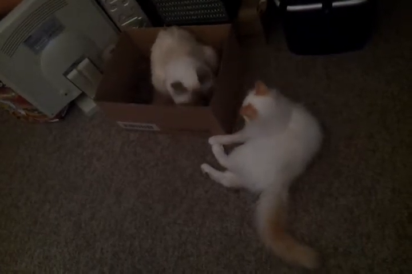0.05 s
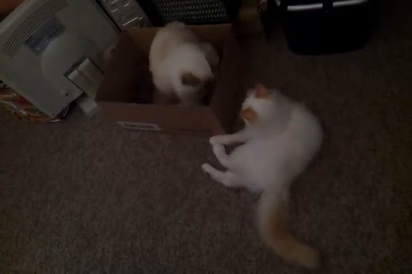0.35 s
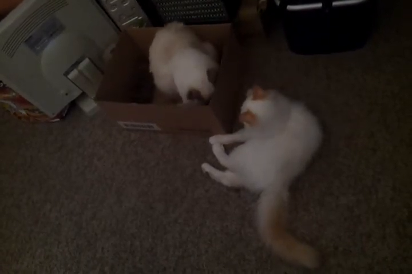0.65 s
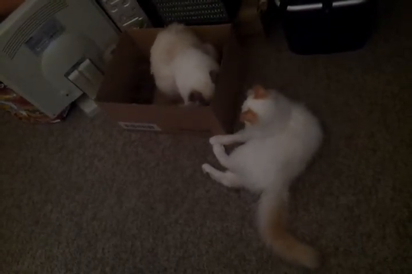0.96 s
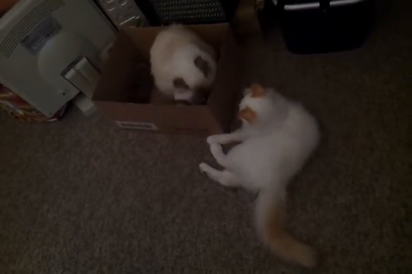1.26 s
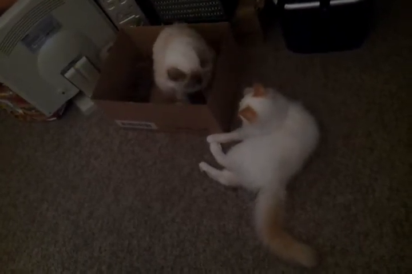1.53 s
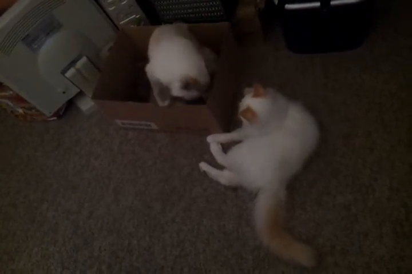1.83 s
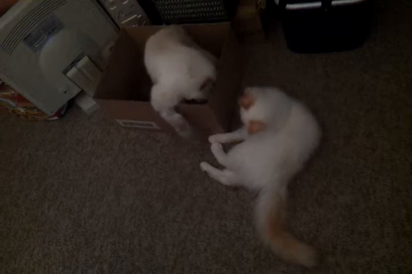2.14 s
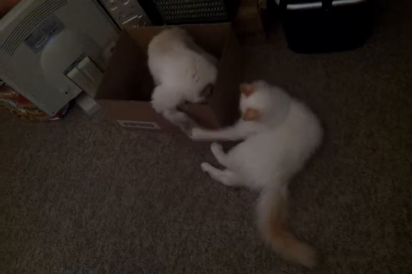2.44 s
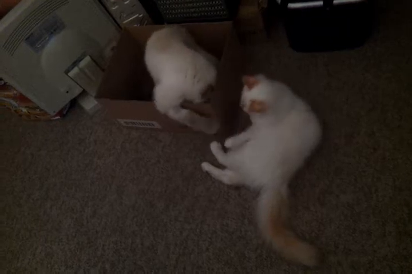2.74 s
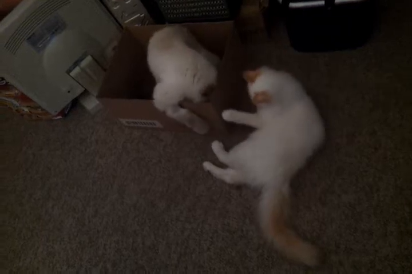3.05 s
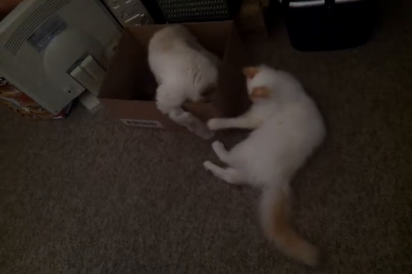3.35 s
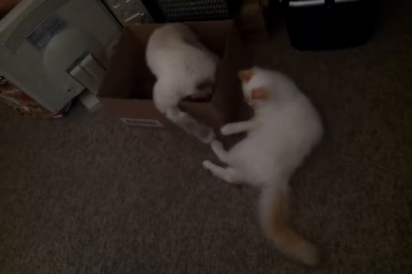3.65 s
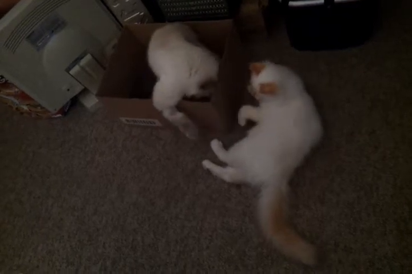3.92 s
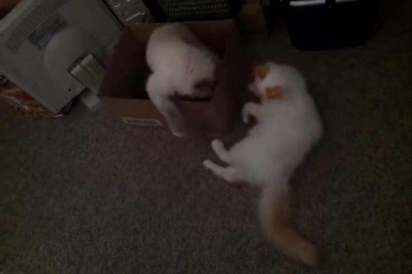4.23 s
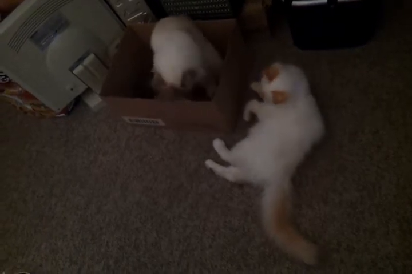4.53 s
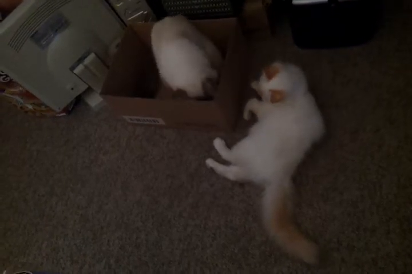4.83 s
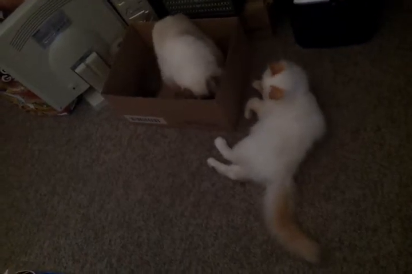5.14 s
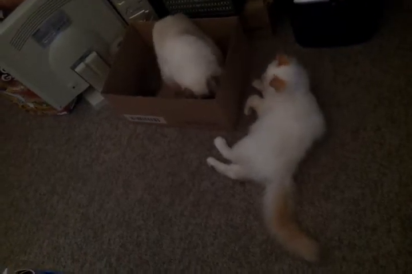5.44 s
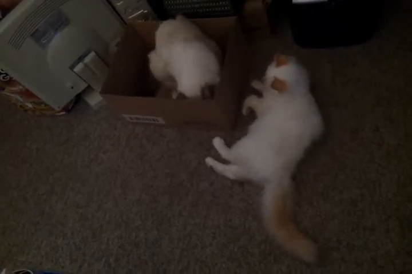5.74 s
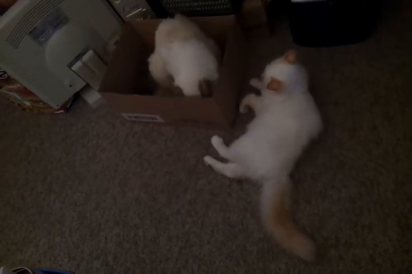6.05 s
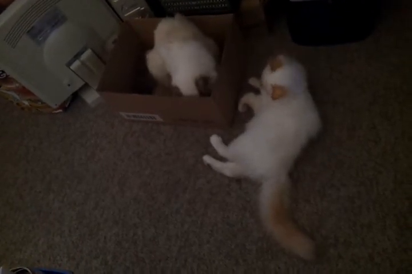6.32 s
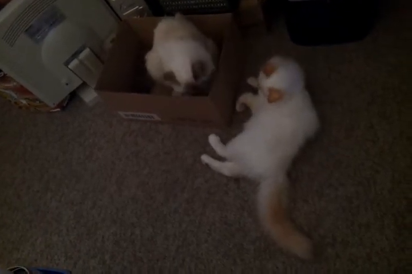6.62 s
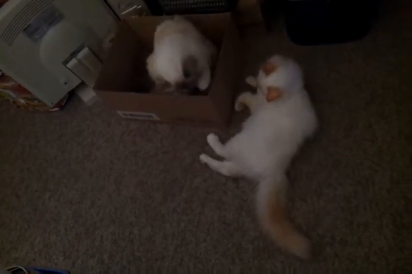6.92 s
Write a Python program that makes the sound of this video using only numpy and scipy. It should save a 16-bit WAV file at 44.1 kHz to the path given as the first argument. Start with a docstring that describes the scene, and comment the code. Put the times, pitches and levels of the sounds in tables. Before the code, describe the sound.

Cats play at a cardboard box in a small carpeted room. A few faint, quick claw scratches come first, then a flurry of hollow paw taps, crisp rasps and low thumps from the box floor, ending in a loud knock. After a lull with light scraping, a claw snaps sharply off the rim, followed by small clicks. One close microphone also picks up a faint steady hum and hiss.

```python
"""A small carpeted room, where two cats play at a cardboard box, one inside it and one lying beside it.
Paws bat the walls and set the panels ringing, claws snag and rasp on the rim, fur brushes the sides,
and the box floor booms as a cat shifts its weight. One small microphone, near enough to catch the
direct sound ahead of the room's short echoes; a faint mains hum and a steady hiss lie underneath."""
import sys
import numpy as np
from scipy import signal
from scipy.fft import rfft, irfft, next_fast_len
from scipy.io import wavfile

SR = 44100
rng = np.random.default_rng(int(sys.argv[2]) if len(sys.argv) > 2 else 0)


def output_pcm(signal):
    """Save a mono or channel-first signal as 16-bit PCM at the path in sys.argv[1].

    Samples are clipped to [-1, 1] before scaling.
    """
    pcm = np.clip(np.atleast_2d(signal).T, -1, 1) * 32767
    wavfile.write(sys.argv[1], SR, np.round(pcm).astype(np.int16))


N = 307818
TIME = np.arange(N) / SR
EVENT_TIME = TIME[:SR // 2]


def from_db(db):
    """Decibels to gain."""
    return 10 ** (np.asarray(db) / 20)


def unit_energy(x):
    """Scale so that the squares sum to one."""
    return x / np.sqrt(np.sum(x ** 2) + 1e-20)


def at_hz(points, hz):
    """Read a table on a log-frequency axis."""
    known_hz, values = np.transpose(points)
    return np.interp(np.log(np.maximum(hz, 1)), np.log(known_hz), values)


def colour(x, spectrum):
    """Causal (minimum-phase) filter with the given spectrum."""
    size = 2 * next_fast_len(len(x))
    gain = from_db(at_hz(spectrum, np.fft.rfftfreq(size, 1 / SR)))
    cepstrum = irfft(np.log(gain))
    cepstrum[1:size // 2] *= 2
    cepstrum[size // 2 + 1:] = 0
    return irfft(rfft(x, size) * np.exp(rfft(cepstrum)))[:len(x)]


def low_pass(x, hz, order=2):
    """Butterworth low-pass."""
    return signal.sosfilt(signal.butter(order, min(hz, SR / 3), fs=SR, output="sos"), x + 1e-18)


def resonate(x, hz, width_hz):
    """One resonance with gain 1 at its peak."""
    radius = np.exp(-np.pi * width_hz / SR)
    feedback = [1, -2 * radius * np.cos(2 * np.pi * hz / SR), radius ** 2]
    return signal.lfilter(np.array([1, 0, -1]) * (1 - radius ** 2) / 2, feedback, x + 1e-18)


def add(track, start_s, sound):
    """Mix a sound in at its start time."""
    start = max(int(start_s * SR), 0)
    track[start:start + len(sound)] += sound[:N - start]


def paw_blows(panel_q=14, damping_hz=42, crunch_db=7.5, panel_db=-0.75):
    """A pad thuds on the box, the struck panel rings, and a claw cracks into the corrugation."""
    # paws batting a wall: start_s, level_db, panel_hz, claw_db (relative to the level)
    blows = [(2.15, -0.5, 605, -12), (2.16, -2.5, 686, -5.5), (2.1687, -7.5, 726, -14.5),
             (2.339, -3, 527, -9.5), (2.675, -12.5, 496, -5), (2.686, -11.5, 520, -15),
             (2.711, -13.5, 1780, -7), (2.826, -12, 1770, 5), (2.846, -11, 2160, 9.5),
             (3.616, 3, 434, -3.5), (3.623, 0, 494, 0.5), (3.632, -6, 1230, 4.5), (6.152, -13, 830, -1)]
    # spectrum of a claw's crack: frequency_hz, level_db
    claw_spectrum = [(200, -28.5), (900, -14.5), (1600, -4.5), (2800, -2), (4300, -7), (5400, -9),
                     (6500, -2.5), (7500, -9.5), (9000, -6.5)]
    contact_hz, crunch_s, doubling_db = 870, 0.006, 16.5
    out, click = np.zeros(N), signal.unit_impulse(len(EVENT_TIME))
    for start_s, level_db, panel_hz, claw_db in blows:
        grip = 2 ** (claw_db / doubling_db)  # more claw: harder contact, longer crunch
        thud = unit_energy(box(low_pass(click, contact_hz * grip, order=1), damping=1.06))
        panel = unit_energy(resonate(click, panel_hz, damping_hz + panel_hz / panel_q))
        crunch = fibre_clicks(per_s=4300, spread_db=2.5) * np.exp(-EVENT_TIME / (crunch_s * grip))
        crack = unit_energy(colour(click + from_db(crunch_db) * unit_energy(crunch), claw_spectrum))
        blow = thud + from_db(panel_db) * panel + from_db(claw_db) * crack
        add(out, start_s, from_db(level_db) * blow)
    return out


def rim_snaps(click_q=0.75, edge_q=9, fibre_hz=5700, tear_s=0.0028, knock_db=-13):
    """One fibre breaks with a click, its neighbours tear after it, and the edge and the box ring."""
    # a claw letting go of the rim: start_s, level_db, edge_hz, ring_db (relative to the level)
    snaps = [(1.414, -18.5, 6560, 2), (2.34, -11, 2050, 0.5), (6.099, 1, 1810, -2.5),
             (6.1011, -8.5, 2990, 6), (6.751, -23.5, 1200, -7), (6.7863, -17, 1140, 6.5)]
    out, click = np.zeros(N), signal.unit_impulse(len(EVENT_TIME))
    knock = unit_energy(box(low_pass(click, hz=1170, order=1), damping=0.53))
    for start_s, level_db, edge_hz, ring_db in snaps:
        click_hz = 3850 * 2 ** (-level_db / 53)  # bigger fibres snap lower, an octave per 53 dB
        tear = unit_energy(fibre_clicks(per_s=2800, spread_db=0) * np.exp(-EVENT_TIME / tear_s))
        force = low_pass(click + tear, fibre_hz, order=3)
        crack = unit_energy(resonate(force, click_hz, click_hz / click_q))
        ring = unit_energy(resonate(click, edge_hz, edge_hz / edge_q))
        snap = crack + from_db(ring_db) * ring + from_db(knock_db) * knock
        add(out, start_s, from_db(level_db) * snap)
    return out


def claw_scratches():
    """Each quick stroke is one scrape of the claws on the cardboard."""
    # claw strokes: start_s, length_s, rasp_db, body_db (relative to the rasp)
    scratches = [(0.052, 0.021, -50.5, -3), (0.439, 0.029, -46, -9), (0.535, 0.03, -51, -2),
                 (.676, 0.019, -52, -4.5), (0.808, 0.017, -45, -17), (0.828, 0.025, -38, -12),
                 (2.06, 0.042, -48.5, 1), (2.341, 0.044, -46, 5), (2.69, 0.026, -40.5, 6.5),
                 (2.835, 0.033, -29.5, -7.5), (4.268, 0.04, -56, -12), (5.62, 0.028, -38, -6.5)]
    out = np.zeros(N)
    for start_s, length_s, rasp_db, body_db in scratches:
        add(out, start_s, scrape(length_s, rasp_db, rasp_db + body_db))
    return out


def floor_thumps(floor_hz=160, contact_hz=190, body_db=-9):
    """A soft push sets the box floor booming, and the walls answer faintly."""
    # the cat shifting its weight: start_s, level_db
    thumps = [(2.673, -6), (2.812, -17), (3.488, -18), (3.71, -7.5), (3.754, -18), (3.775, -22),
              (4.222, -22.5), (4.289, -23)]
    out, click = np.zeros(N), signal.unit_impulse(len(EVENT_TIME))
    push = resonate(click, floor_hz, width_hz=170)
    boom = unit_energy(resonate(push, floor_hz, width_hz=40))
    body = unit_energy(box(low_pass(click, contact_hz, order=1), damping=0.97))
    for start_s, level_db in thumps:
        add(out, start_s, from_db(level_db) * (boom + from_db(body_db) * body))
    return out


def paw_swipes(wall_hz=1065, wall_q=2.4):
    """Soft, dense friction of fur and pad stirs one broad wall resonance; the claws trail lightly."""
    # slow swipes along a wall: start_s, length_s, level_db
    swipes = [(1.036, .12, -61), (1.946, .085, -54.5), (1.995, 0.019, -54), (2.218, 0.1, -58.5),
              (2.539, 0.075, -55.5), (2.623, 0.046, -50), (5.67, 0.069, -53.5), (6.577, 0.074, -65),
              (6.715, .05, -61)]
    out, width_hz = np.zeros(N), wall_hz / wall_q
    for start_s, length_s, level_db in swipes:
        friction = fibre_clicks(per_s=7700, spread_db=2) * pressure(length_s)
        wall = resonate(resonate(friction, wall_hz, width_hz), wall_hz, width_hz)
        rub = np.sqrt(length_s * SR) * unit_energy(wall)
        claws = scrape(length_s, rasp_db=-2, body_db=-1)
        add(out, start_s, from_db(level_db) * (rub + claws))
    return out


def scrape(length_s, rasp_db, body_db):
    """Claws slip across the fibres: the slips rasp directly and also shake the box."""
    # spectrum of claws rasping on cardboard: frequency_hz, level_db
    rasp_spectrum = [(200, -14.5), (900, -12), (1600, -8), (2600, -4), (4300, -8), (6500, -8), (7500, -7.5),
                     (9000, -9.5)]
    slips = fibre_clicks(per_s=3000, spread_db=3.0) * pressure(length_s)
    body = unit_energy(box(slips, damping=1.64))
    rasp = unit_energy(colour(slips, rasp_spectrum))
    return (from_db(body_db) * body + from_db(rasp_db) * rasp) * np.sqrt(length_s * SR)


def fibre_clicks(per_s, spread_db):
    """Paper fibres catch and let go: random clicks of uneven size."""
    count = len(EVENT_TIME)
    sizes = from_db(spread_db * np.minimum(rng.exponential(1, count), 4))
    return (rng.random(count) < per_s / SR) * sizes * rng.choice([-1, 1], count)


def pressure(length_s):
    """A paw's pressure swells and eases over one stroke."""
    return np.sin(np.pi * np.minimum(EVENT_TIME / length_s, 1)).clip(0) ** 0.63


def box(force, damping):
    """The box answers a force with all of its modes; a paw resting on it widens them."""
    # modes of the cardboard box: pitch_hz, width_hz (at damping 1), level_db
    modes = [(144, 22, -8), (268, 53, -8.5), (372, 22, 2), (525, 61, 5.5), (742, 51, -0.5), (944, 74, -0.5),
             (1085, 53, -3.5), (1240, 78, -0.5), (1755, 150, -5), (1990, 68, -7), (2500, 49, -11),
             (3040, 73, -20)]
    return sum((-1) ** k * from_db(level_db) * resonate(force, pitch_hz, damping * width_hz)
               for k, (pitch_hz, width_hz, level_db) in enumerate(modes))


def room(x, tail_db, echo_db, build_s=0.0011):
    """Direct sound reaches the microphone, then near echoes and a tail that dies band by band."""
    # echoes off the carpet, furniture and walls: delay_s, level_db (relative to echo_db)
    echoes = [(.0026, -10), (.0058, -15), (.0078, -11.5), (0.0146, -11.5), (0.0166, -9), (0.0177, -18.5),
              (0.0246, -11)]
    # decay of the diffuse tail: frequency_hz, t60_s
    tail_decay = [(150, 0.4), (550, 0.25), (1300, 0.2), (3000, 0.32), (7000, 0.23)]
    # strength of the diffuse tail: frequency_hz, level_db (relative to tail_db)
    tail_spectrum = [(150, -11), (350, -4), (700, -4.5), (1300, 5.5), (3000, -3), (7000, -2)]
    response = signal.unit_impulse(len(EVENT_TIME))
    for delay_s, level_db in echoes:
        response[int(delay_s * SR)] += from_db(level_db + echo_db)
    edges_hz = np.geomspace(70, 11000, num=19)
    swell = 1 - np.exp(-EVENT_TIME / build_s)
    for low, high in zip(edges_hz, edges_hz[1:]):
        hz = np.sqrt(low * high)
        band = signal.butter(3, [low, high], "band", fs=SR, output="sos")
        noise = signal.sosfilt(band, rng.standard_normal(SR))[-len(EVENT_TIME):]
        decay = np.exp(-np.log(1000) * EVENT_TIME / at_hz(tail_decay, hz))
        gain = from_db(tail_db + at_hz(tail_spectrum, hz)) * np.sqrt(2 * (high - low) / SR)
        response += gain * unit_energy(noise * swell * decay)
    return signal.fftconvolve(x, even_out(response))[:N]


def even_out(response):
    """Level a response in sixth-octave steps, so it spreads sound in time without tinting it."""
    power, hz = np.abs(rfft(response)) ** 2, np.fft.rfftfreq(len(response), 1 / SR)
    gains = [(centre, -10 * np.log10(power[np.abs(hz - centre) < 10 + centre / 10].mean()))
             for centre in np.geomspace(60, 12000, num=46)]
    return colour(response, gains)


def room_tone(air_db=-54.5, waver=0.19, waver_hz=4.6):
    """Steady rumble and hiss, and the slightly wavering hum of an appliance."""
    # spectrum of the room air's rumble and the hiss above it: frequency_hz, relative_db
    air_spectrum = [(20, -14), (35, -3), (55, -11), (110, -5), (170, -1), (230, -2), (340, -3.5),
                    (420, -5.5), (1300, -9), (2200, -15), (3800, -18), (6300, -19), (7400, -24),
                    (9000, -26)]
    # tones of the hum: pitch_hz, level_db
    hum_tones = [(120, -64.5), (167, -66.5), (311, -67), (353, -70)]
    out = from_db(air_db) * np.sqrt(N) * unit_energy(colour(rng.standard_normal(N), air_spectrum))
    for pitch_hz, level_db in hum_tones:
        swell, sway = np.sqrt(2 * N) * unit_energy(low_pass(rng.standard_normal((2, N)), waver_hz))
        tone = np.sqrt(2) * np.sin(2 * np.pi * pitch_hz * TIME + waver * sway)
        out += from_db(level_db) * (1 + waver * swell) * tone
    return out


def scene(rim_db=-2.0):
    """The box walls radiate all round the room; snaps on the rim reach the microphone more directly."""
    play = paw_blows() + floor_thumps() + claw_scratches() + paw_swipes()
    walls = room(play, tail_db=0.5, echo_db=-1.0)
    rim = from_db(rim_db) * room(rim_snaps(), tail_db=-2.0, echo_db=-4.0)
    return (walls + rim + room_tone())[None]


def record(dry, rolloff_hz=7300, cutoff_hz=9050):
    """A small mono microphone whose treble rolls off before a steep cut."""
    rolloff = signal.firwin(numtaps=45, cutoff=rolloff_hz, fs=SR)
    cut = signal.firwin(numtaps=401, cutoff=cutoff_hz, fs=SR)
    return signal.fftconvolve(dry, np.convolve(rolloff, cut)[None], mode="same")


dry = scene()
out = record(dry)
output_pcm(out)
```